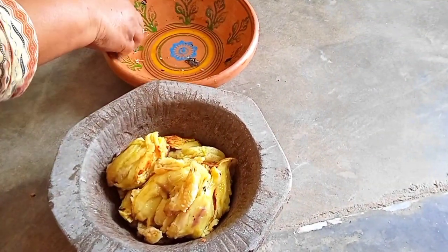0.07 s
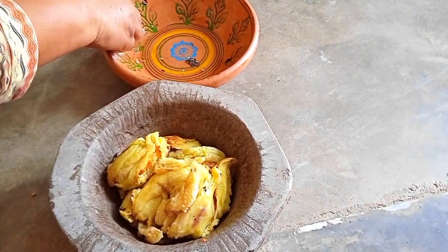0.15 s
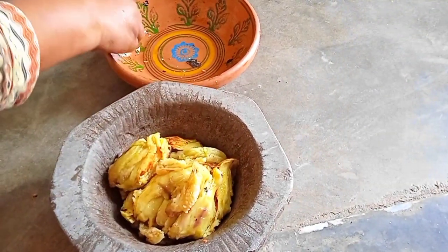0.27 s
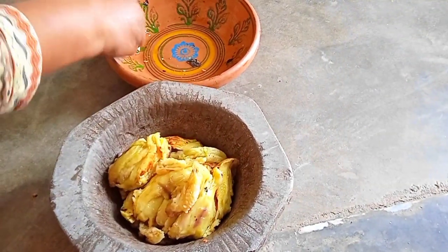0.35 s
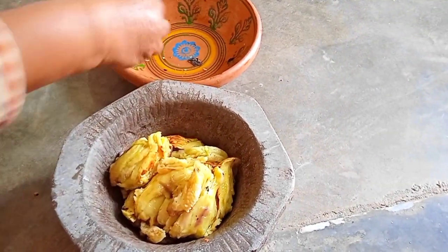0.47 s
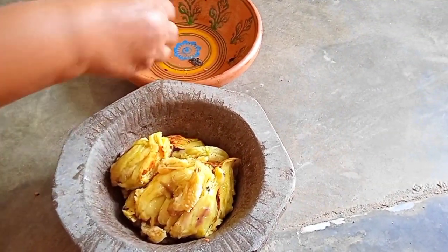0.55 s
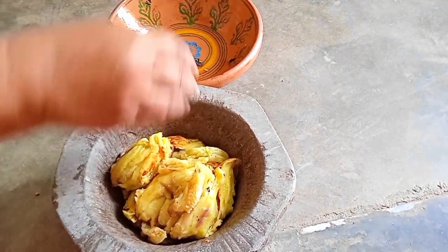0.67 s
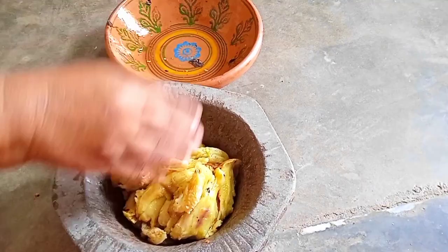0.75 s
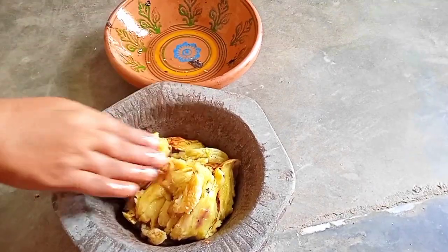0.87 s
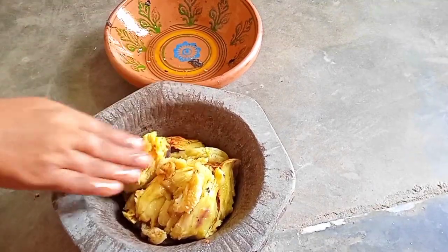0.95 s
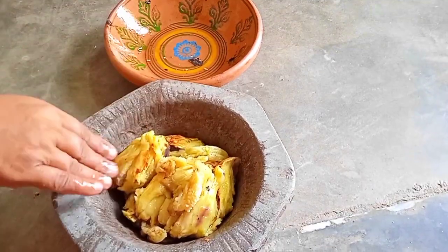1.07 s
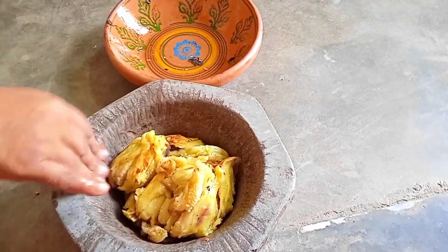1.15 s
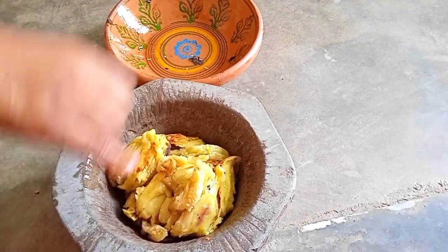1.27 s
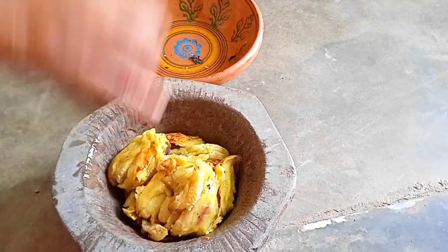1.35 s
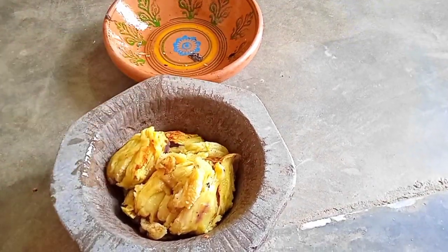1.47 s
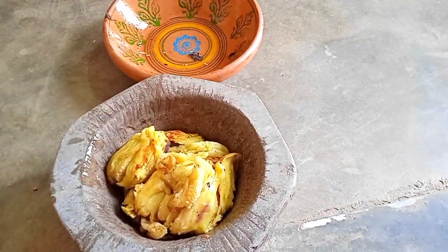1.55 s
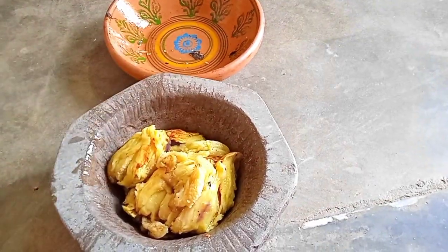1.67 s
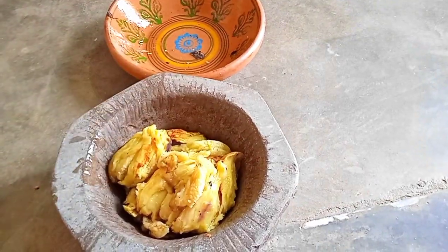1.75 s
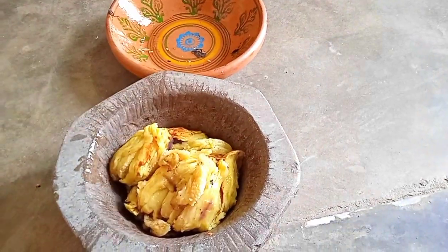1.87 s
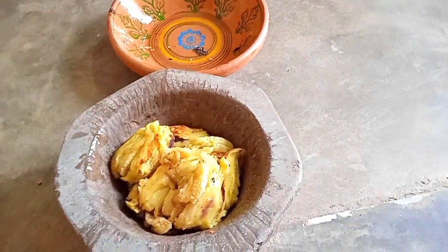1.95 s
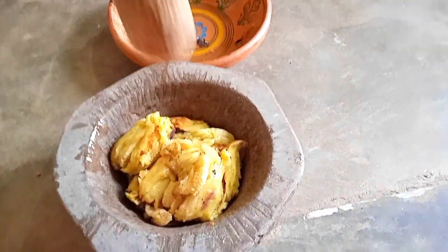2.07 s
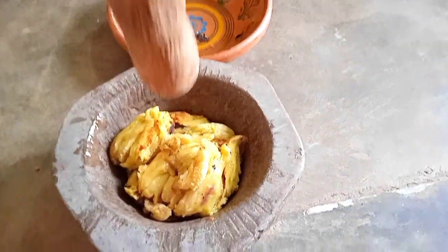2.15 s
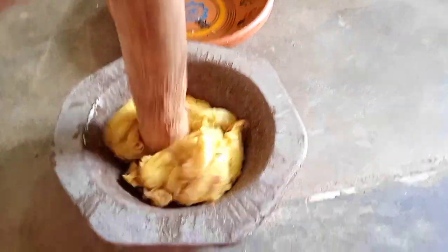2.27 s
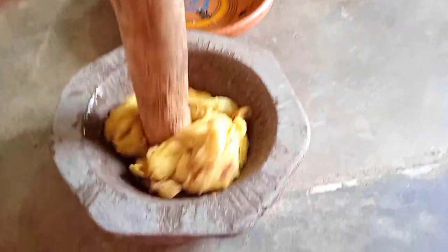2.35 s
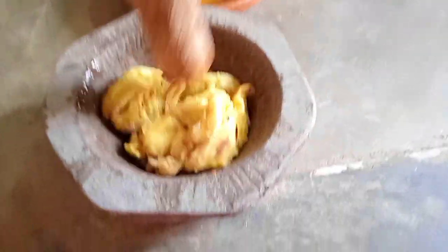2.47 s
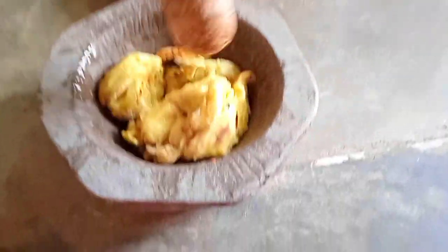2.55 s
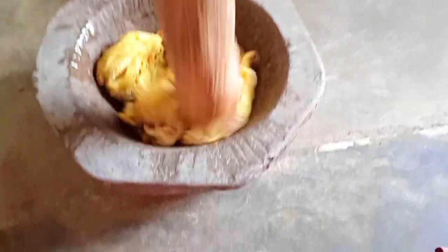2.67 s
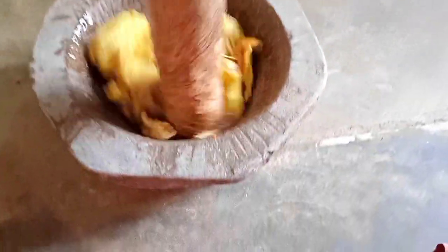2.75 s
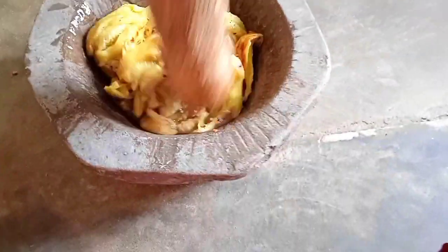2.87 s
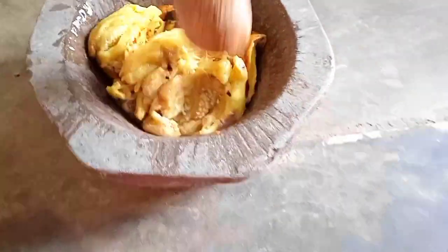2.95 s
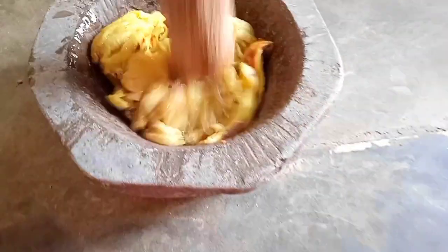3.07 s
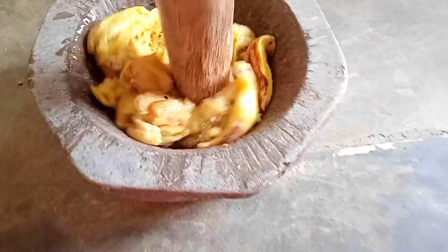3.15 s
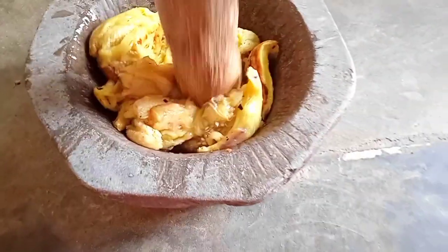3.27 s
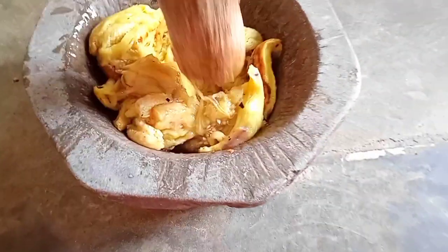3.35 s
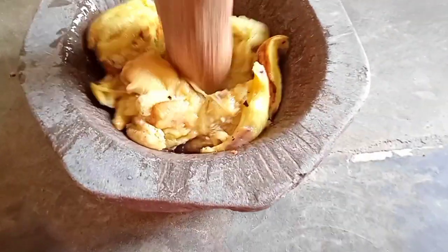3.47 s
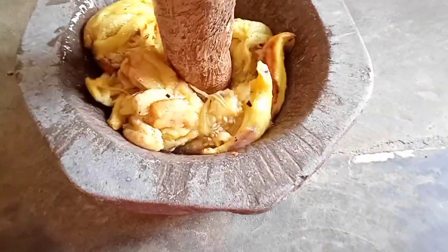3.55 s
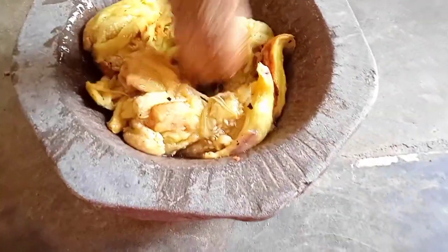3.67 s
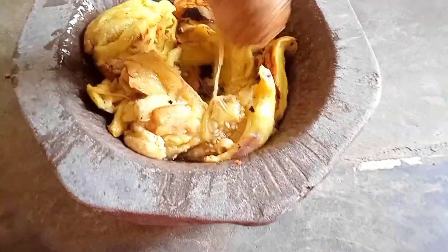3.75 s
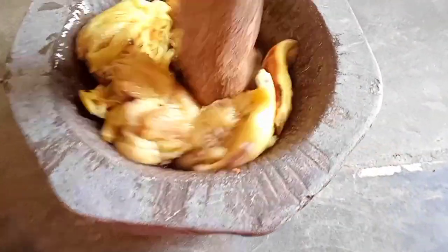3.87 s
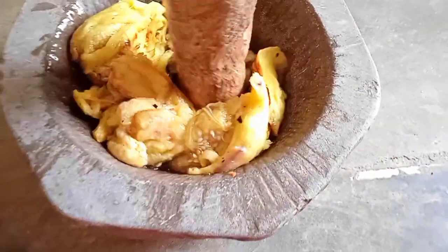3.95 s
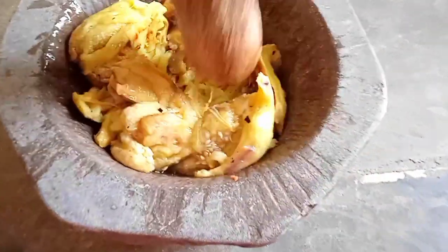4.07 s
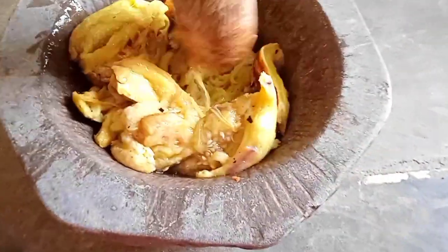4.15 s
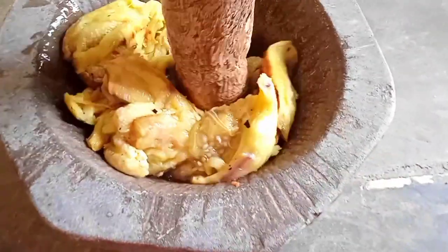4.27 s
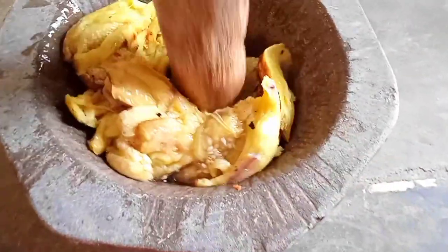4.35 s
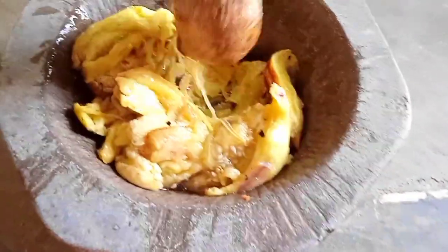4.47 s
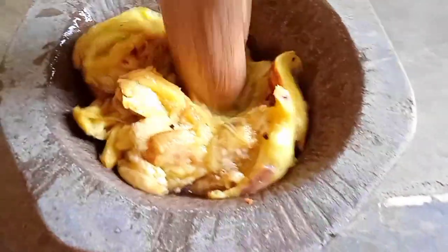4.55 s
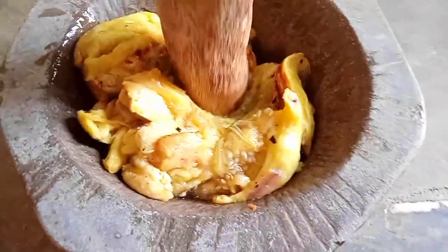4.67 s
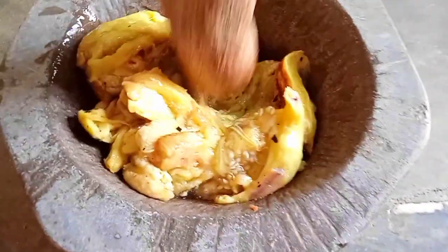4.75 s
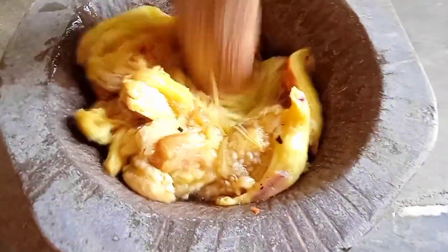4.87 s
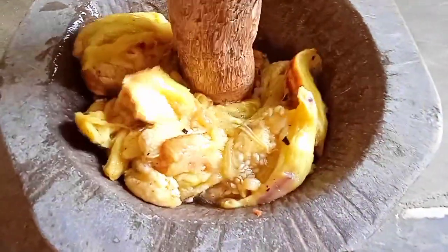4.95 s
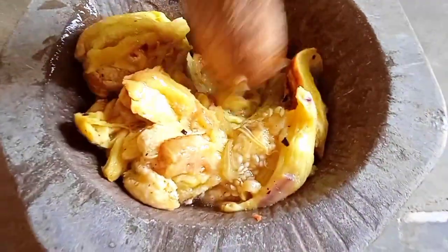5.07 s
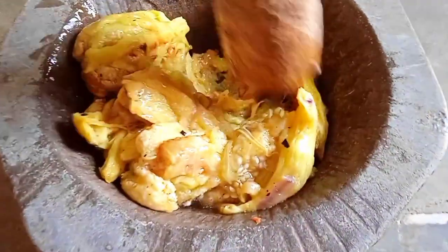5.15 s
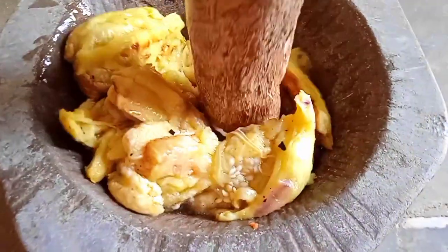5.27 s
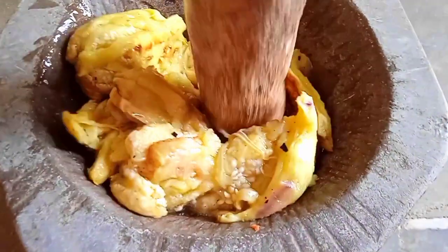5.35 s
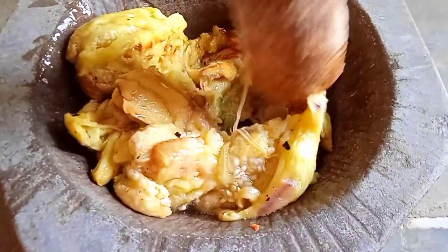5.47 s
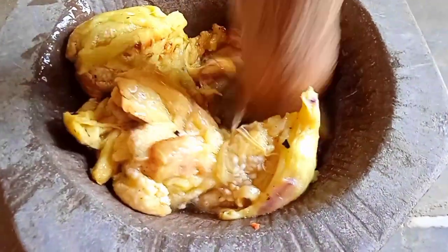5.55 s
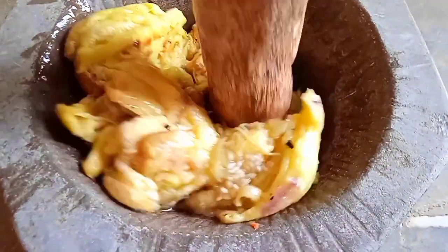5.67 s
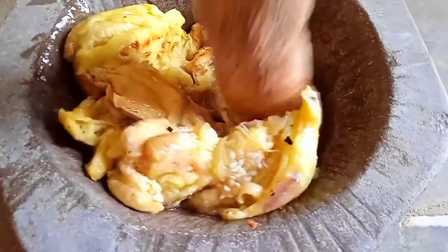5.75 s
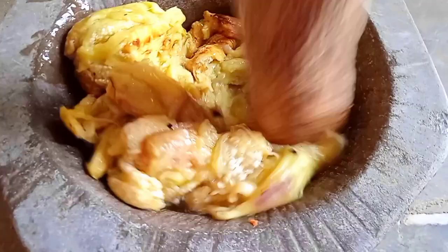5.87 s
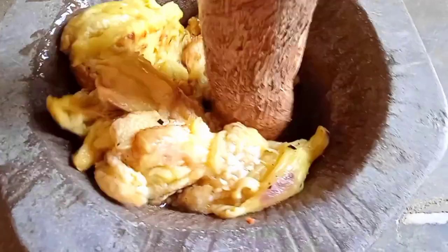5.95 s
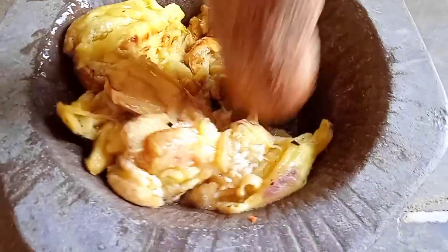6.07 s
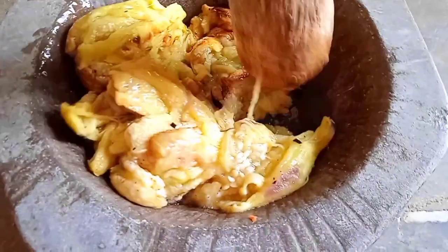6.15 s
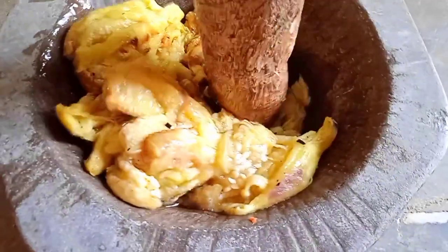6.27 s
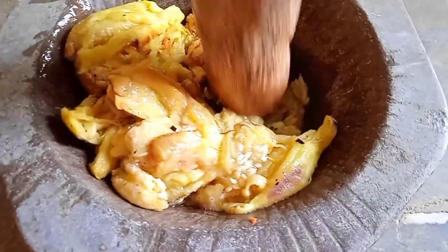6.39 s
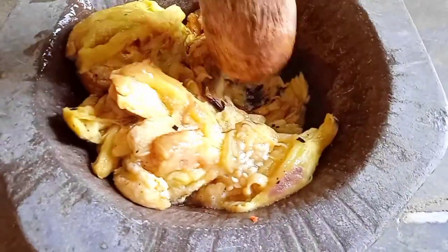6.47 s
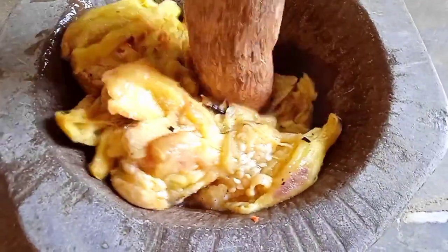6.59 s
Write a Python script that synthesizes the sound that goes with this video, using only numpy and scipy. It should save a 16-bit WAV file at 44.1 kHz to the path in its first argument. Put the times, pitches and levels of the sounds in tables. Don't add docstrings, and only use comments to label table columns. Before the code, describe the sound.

From 0 to 2.3 seconds there is only a quiet, slightly fluttering air wash and a thin wavering whine from a small motor nearby, which continues throughout. At about 2.3 seconds soft sticky squelches begin, and a muted, low first thud lands near 2.8. Small wet smacks and squishes follow. Two hard wood-on-stone knocks come at 3.6 and 3.9, then a weak one at 4.3. Sticky tearing and popping fill the gap until 4.9, when steady pounding starts: strong knocks at about 5.0, 5.3, 5.6, 6.0, 6.3 and 6.6, three a second. Each is abrupt and dull, with a very short hollow bowl ring, crushed mash and a bright wet splash, growing wetter towards the end. Squelches and suction sounds fall between blows. The close phone microphone catches short, boxy echoes from a bare hard room; the last knock is still echoing when it ends.

```python
import sys
import numpy as np
from scipy import signal
from scipy.fft import rfft, irfft
from scipy.io import wavfile
from scipy.ndimage import uniform_filter1d, minimum_filter1d

SR = 44100
rng = np.random.default_rng(int(sys.argv[2]) if len(sys.argv) > 2 else 0)


def output_pcm(signal):
    pcm = np.clip(np.atleast_2d(signal).T, -1, 1) * 32767
    wavfile.write(sys.argv[1], SR, np.round(pcm).astype(np.int16))


def elevation(decibels):
    levels = np.asarray(decibels, float)
    return 10 ** (levels / 20)


N = 291942

# [f/Hz, density/dB per Hz]
WASH_SPECTRUM = [(25, -21), (70, -20.5), (100, -8), (200, -13.5), (470, -11), (580, -17), (1400, -14),
                 (2680, -20), (2850, -13.5), (3150, -26), (4200, -28), (5000, -25), (9000, -37),
                 (16000, -70)]
# [f/Hz, level/dB rms]
MOTOR_TONES = [(102, -64), (533, -75), (678, -70.5), (808, -70.5), (1087, -62.5), (1637, -91), (1723, -70),
               (2444, -70.5), (2525, -92), (2762, -61), (2853, -59), (2940, -68.5), (3068, -71),
               (4940, -72), (5486, -71)]
WASH_DB, FLUTTER_DB = -52.5, 1.73
TONE_WIDTH = 0.017

# [f/Hz, gain/dB]
MIC_RESPONSE = [(30, 1.5), (95, 8.5), (3000, -0.5), (4200, -9), (4900, -9.5), (9000, -7.5), (13500, 3),
                (15200, 2.5), (16300, -30)]
PORT_HZ, PORT_Q, PORT_DB = 15300, 12, -85.5
CEILING = 0.88

# [f/Hz, t60/s]
ROOM_T60 = [(100, 1.34), (260, 0.74), (700, 0.5436), (1840, 0.6746), (4850, 0.5), (12000, 0.14)]
# [f/Hz, level/dB]
ROOM_COLOUR = [(100, 9), (260, 5.5), (600, 6.5), (1400, -1), (2300, -8.5), (3200, 0.5), (4850, 9),
               (12000, -2.5)]
ROOM_DB, ROOM_GAP_S, ROOM_RISE_S = -2, 0.011, 0.0044
SPOTS = 3

# [t/s, level/dB, mist/dB re level]
SMACKS = [(2.37, -42.5, -30), (2.728, -45, -14), (2.422, -54, -8), (2.487, -55, -6), (2.868, -47, -22),
          (2.9, -50, -30), (3.156, -40, -20), (3.27, -45, -21), (3.208, -58, -11), (3.285, -48, -4),
          (3.344, -54, -12), (3.515, -43, -19), (3.648, -63, 6), (4.23, -42, -25), (4.358, -26, -23),
          (5.259, -44, -24), (5.593, -35.5, -16), (5.753, -50, -10), (5.765, -36.5, -30),
          (6.577, -36.5, -37), (6.605, -42, -13)]
SMACK_S, SMACK_HOLLOW_HZ, SMACK_HOLLOW_DB = 0.0041, 1510, 3
# [t/s, level/dB, hollow f/Hz, hollow/dB re level]
POCKETS = [(3.297, -48, 1270, 31.5), (3.538, -65, 1340, 25), (3.893, -40.5, 1400, 23),
           (3.9415, -30.5, 3100, 27), (4.059, -30.5, 1930, 16), (4.358, -38, 3600, 24.5),
           (4.745, -41.5, 1770, 17), (4.916, -40, 1300, 22), (5.737, -29.5, 1830, 22.5),
           (5.748, -61, 1250, 14), (6.266, -33, 3000, 14), (6.4475, -41, 1260, 26)]
POCKET_S, POCKET_MIST_DB = 0.0024, -14.5
# [t/s, level/dB, hollow/dB re level, mist/dB re level]
SQUELCHES = [(2.3327, -39, 4, -34), (2.4687, -47, 3, -14), (3.1215, -45.5, 13, -7.5), (3.143, -50, 15, -18),
             (3.1966, -43.5, -13, -16), (3.313, -46, 14, -5), (3.5253, -35.5, 16.5, -5),
             (3.551, -41, 9, -18), (3.923, -34.5, 5, -19), (4.254, -37, -2, -19), (4.929, -31, -6, -16),
             (5.073, -40, -6, -16), (5.263, -35.5, -3, -29), (5.599, -36.5, -10, -16), (5.615, -44, 4, -3),
             (5.934, -38.5, 17.5, -13), (6.2637, -28, 0, -20)]
SQUELCH_S, SQUELCH_HOLLOW_HZ = 0.019, 1300
# [t/s, level/dB, hollow/dB re level, mist/dB re level]
TEARS = [(2.311, -35, 9.5, -11), (2.747, -34.5, 10.5, -25), (2.7674, -28, 10, -18), (3.903, -40, 16.5, -7),
         (4.241, -33, 9, -24), (4.363, -35.5, 12.5, -18), (4.584, -35.5, 10, -10), (4.604, -29, 15, -29),
         (4.758, -30.5, 14.5, -38), (6.278, -24, 4.5, -11)]
TEAR_S, TEAR_HOLLOW_HZ = 0.016, 2050
# [t/s, level/dB, mist/dB re level]
SPLASHES = [(2.7814, -52, -21), (3.5728, -31.5, -21), (3.9423, -25, -40), (4.2828, -36.5, -14),
            (4.959, -25, -13), (5.3035, -17.5, -13), (5.637, -17, -11), (5.9707, -25.5, -39),
            (5.9766, -24, 0), (6.2917, -15.5, -41), (6.6144, -12.5, -82)]
SPLASH_S, SPLASH_HOLLOW_HZ, SPLASH_HOLLOW_DB = 0.0017, 5160, 13.5
SPRAY_HZ, SPRAY_Q, FINE_HZ, FINE_Q = 6220, 2.13, 11600, 1.1
HOLLOW_Q, HOLLOW_DB = 2.23, -13.5
POP_SCATTER_DB, POP_CAP = 3.2, 3.5
WORKED_FROM_S, OOZE_REST_DB, SLUMP_DB, SLUMP_S = 2.27, -85, -32, 0.08
WET_ROOM_DB, SPLASH_ROOM_DB = -17, -16.5

# [t/s, knock/dB, bowl/dB re knock, pestle/dB re knock, stone/dB re knock]
BLOWS = [(2.7822, -27.5, 3, -0.5, -32), (3.573, -6, -6, -18, -15), (3.9422, -7, -5.5, -10, -16.5),
         (4.282, -29.5, 7.5, -20, -37), (4.9251, -23.5, 0, 11.5, -6.5), (4.96, -7, -9, -16, -17),
         (5.3046, -4, -5.5, -8.5, -11.5), (5.638, -6, -11, -3.5, -11.5), (5.976, -3.5, -12.5, -13.5, -17),
         (6.2926, -2, -9.5, -7, -15), (6.6152, -4, -11.5, -37, -12)]
# [f/Hz, level/dB, t60/s]
BOWL_MODES = [(166, -11, 0.11), (233.6, -1.5, 0.068), (304, 0.5, 0.064), (428.5, -2, 0.034),
              (513, -5, 0.014), (595, 7, 0.016), (847, -11.5, 0.11)]
# [f/Hz, level/dB, t60/s]
PESTLE_MODES = [(960, -10, .025), (1232, 0, .034), (1340, -9, .03), (1750, -13, .012)]
# [f/Hz, level/dB, t60/s]
STONE_MODES = [(2379, -6, 0.041), (2450, -20.5, 0.48), (4850, -43, .012)]
KNOCK_HZ, KNOCK_HZ_PER_DB, KNOCK_CYCLES = 1650, 28, 0.58
KNOCK_LEAD_S = 0.002
RING_LAG_S = 0.0021
BOWL_RISE_S, RING_RISE_S = 0.0033, 0.00017
MODE_SCATTER_DB, MODE_DETUNE = 1.5, 0.015
STONE_STEADY = 0.2
CRUSH_DB, CRUSH_S, CRUSH_TOP_HZ = 7.5, 0.0037, 2533
BASS_CUT_HZ = 273
RING_ROOM_DB = -8
BOWL_ROOM_DB = -10
HARD_ROOM_SHARE = 0.1


def along(table, hz):
    f, v = np.transpose(table)
    return np.interp(np.log(np.maximum(hz, 1)), np.log(f), v)


def level(x, db):
    return x * elevation(db) / np.sqrt(np.mean(x ** 2))


def add(out, x, s):
    i = int(s * SR)
    out[i:i + len(x)] += x[:len(out) - i]


def octaves(size, step):
    hz = 30 * 2 ** np.arange(0, 9.5, step)
    f = np.maximum(np.fft.rfftfreq(size, 1 / SR), 1)
    distance = np.log2(f / hz[:, None]) / step
    share = np.cos(np.pi / 2 * np.clip(distance, -1, 1)) ** 2
    return hz, irfft(rfft(rng.standard_normal(size)) * share, size)


def resonate(x, hz, q):
    b, a = signal.iirpeak(hz, q, fs=SR)
    y = signal.lfilter(b, a, signal.lfilter(b, a, x))
    return y / np.abs(y).max()


def motor():
    f = np.fft.rfftfreq(N, 1 / SR)
    _, bands = octaves(N, 0.505)
    hold = SR // 12
    steps = np.repeat(rng.standard_normal((len(bands), N // hold + 1)), hold, axis=1)[:, :N]
    flutter = elevation(FLUTTER_DB * uniform_filter1d(steps, hold, axis=1))
    air = (bands * flutter).sum(axis=0)
    out = level(irfft(rfft(air) * elevation(along(WASH_SPECTRUM, f)), N), WASH_DB)
    for hz, db in MOTOR_TONES:
        width = TONE_WIDTH * hz + 4
        peak = 1 / (1 + (2 * (f - hz) / width) ** 2)
        out += level(irfft(rfft(rng.standard_normal(N)) * peak, N), db)
    return out


def port_hiss():
    return level(resonate(rng.standard_normal(N), PORT_HZ, PORT_Q), PORT_DB)


def room():
    t = np.arange(SR) / SR
    hz, bands = octaves(SR, 0.5)
    fade_db = along(ROOM_COLOUR, hz)[:, None] - 60 * t / along(ROOM_T60, hz)[:, None]
    late = np.maximum(t - ROOM_GAP_S, 0)
    echo = (bands * elevation(fade_db)).sum(axis=0) * (1 - np.exp(-late / ROOM_RISE_S))
    return elevation(ROOM_DB) * echo / np.sqrt(np.sum(echo ** 2))


def film(rows, size, hold=48):
    pops = np.repeat(rng.exponential(size=(rows, size // hold + 1)), hold, axis=1)[:, :size]
    return rng.standard_normal((rows, size)) * elevation(POP_SCATTER_DB * np.minimum(pops, POP_CAP))


def ooze():
    t = np.arange(N) / SR
    swell = elevation(OOZE_REST_DB) * (t > WORKED_FROM_S)
    for s, db, _ in SPLASHES:
        u = np.maximum(t - s, 0) / SLUMP_S
        swell += elevation(db + SLUMP_DB) * u ** 2 * np.exp(-u ** 2)
    return swell * level(resonate(film(1, N)[0], SPRAY_HZ, SPRAY_Q), 0)


def burst_films(events):
    out, size = np.zeros(N), 4096
    t = np.arange(size) / SR
    for (s, db, length_s, hollow_hz, hollow_db, mist_db), pops in zip(events, film(len(events), size)):
        u = 3 * t / length_s
        burst = pops * u * np.exp(-u)
        spray = resonate(burst, SPRAY_HZ, SPRAY_Q)
        mist = elevation(mist_db) * resonate(burst, FINE_HZ, FINE_Q)
        hollow = elevation(hollow_db + HOLLOW_DB) * resonate(burst, hollow_hz, HOLLOW_Q)
        add(out, elevation(db) * (spray + mist + hollow), s)
    return out


def mash():
    wet = [(s, db, SMACK_S, SMACK_HOLLOW_HZ, SMACK_HOLLOW_DB, mist) for s, db, mist in SMACKS]
    wet += [(s, db, POCKET_S, hz, hollow, POCKET_MIST_DB) for s, db, hz, hollow in POCKETS]
    wet += [(s, db, SQUELCH_S, SQUELCH_HOLLOW_HZ, *rest) for s, db, *rest in SQUELCHES]
    wet += [(s, db, TEAR_S, TEAR_HOLLOW_HZ, *rest) for s, db, *rest in TEARS]
    return burst_films(wet)


def splashes():
    return burst_films([(s, db, SPLASH_S, SPLASH_HOLLOW_HZ, SPLASH_HOLLOW_DB, mist)
                        for s, db, mist in SPLASHES])


def ring(modes, t, rise_s, chance):
    hz, db, t60 = np.transpose(modes)[:, :, None]
    db = db + MODE_SCATTER_DB * chance[:len(modes), None]
    hz = hz * (1 + MODE_DETUNE * chance[-len(modes):, None])
    waves = elevation(db) * np.sin(2 * np.pi * hz * t) * 1000. ** (-t / t60)
    return waves.sum(axis=0) * (1 - np.exp(-t / rise_s))


def crushed_grit(after):
    dull = signal.butter(8, CRUSH_TOP_HZ, fs=SR, output="sos")
    grit = signal.sosfilt(dull, rng.standard_normal((len(BLOWS), len(after))))
    return level(grit, CRUSH_DB) * np.exp(-after / CRUSH_S) * (1 - np.exp(-after / RING_RISE_S))


def blows():
    out, t = np.zeros((1 + SPOTS, N)), np.arange(SR // 4) / SR
    after = np.maximum(t - RING_LAG_S, 0)
    chances = rng.standard_normal((len(BLOWS), 3, 12))
    crushes = crushed_grit(after)
    for k, (s, db, bowl_db, pestle_db, stone_db) in enumerate(BLOWS):
        chance = chances[k]
        turns = (KNOCK_HZ + KNOCK_HZ_PER_DB * db) * (t - KNOCK_LEAD_S)
        knock = np.cos(2 * np.pi * turns - 0.7) * np.exp(-(turns / KNOCK_CYCLES) ** 2)
        bowl = elevation(bowl_db) * ring(BOWL_MODES, after, BOWL_RISE_S, chance[0])
        pestle = elevation(pestle_db) * ring(PESTLE_MODES, after, RING_RISE_S, chance[1])
        stone = ring(STONE_MODES, after, RING_RISE_S, STONE_STEADY * chance[2])
        body = pestle + elevation(stone_db) * (stone + crushes[k])
        near = knock + body + bowl
        far = knock + elevation(RING_ROOM_DB) * body + elevation(BOWL_ROOM_DB) * bowl
        add(out[0], elevation(db) * near, s - KNOCK_LEAD_S)
        add(out[1 + k % SPOTS], elevation(db * (1 + HARD_ROOM_SHARE)) * far, s - KNOCK_LEAD_S)
    return signal.sosfilt(signal.butter(2, BASS_CUT_HZ, "high", fs=SR, output="sos"), out)


def scene():
    background = motor() + port_hiss()
    wet, splash = mash(), splashes()
    hard, *sends = blows()
    sends[0] = sends[0] + elevation(WET_ROOM_DB) * wet + elevation(SPLASH_ROOM_DB) * splash
    echo = sum(signal.fftconvolve(send, room())[:N] for send in sends)
    return (background + echo + ooze() + wet + splash + hard)[None]


def microphone(dry):
    size = 2048
    cepstrum = irfft(np.log(elevation(along(MIC_RESPONSE, np.fft.rfftfreq(size, 1 / SR)))))
    cepstrum[1:size // 2] *= 2
    cepstrum[size // 2 + 1:] = 0
    response = irfft(np.exp(rfft(cepstrum)))
    return signal.fftconvolve(dry, response[None], axes=1)[:, :N]


def limit(x, size=96):
    gain = minimum_filter1d(CEILING / np.maximum(np.abs(x), CEILING), size * 2, axis=1)
    return x * uniform_filter1d(gain, size, axis=1)


def roll_off(x):
    return signal.sosfilt(signal.butter(12, 16430, fs=SR, output="sos"), x)


def record(dry):
    return roll_off(limit(microphone(dry)))


dry = scene()
out = record(dry)
output_pcm(out)
```